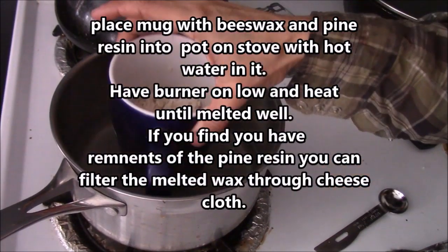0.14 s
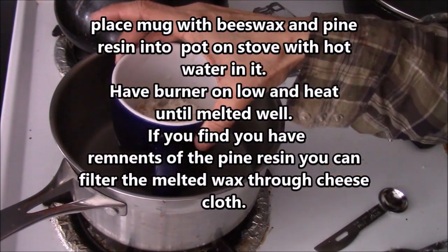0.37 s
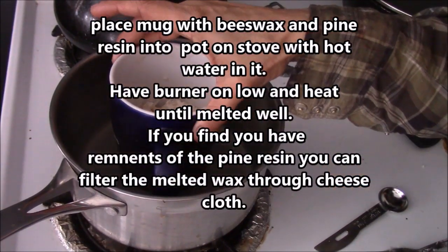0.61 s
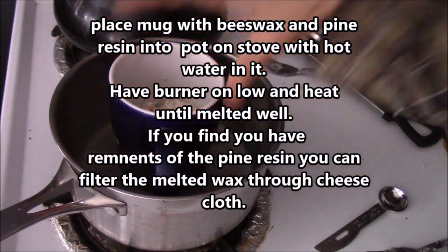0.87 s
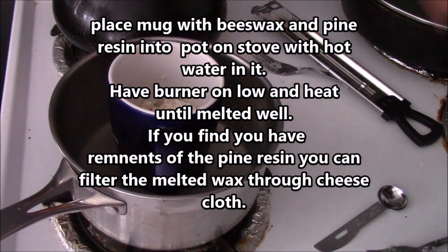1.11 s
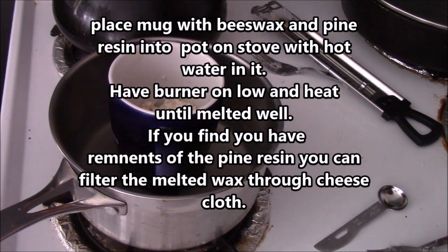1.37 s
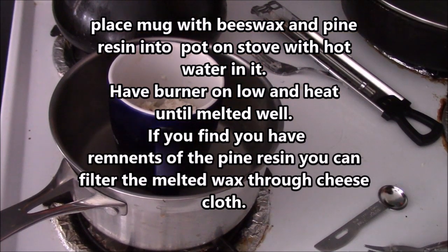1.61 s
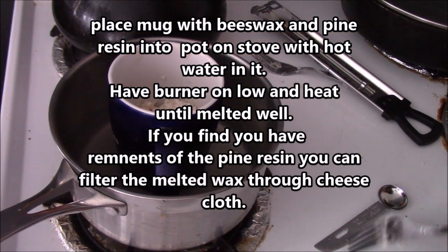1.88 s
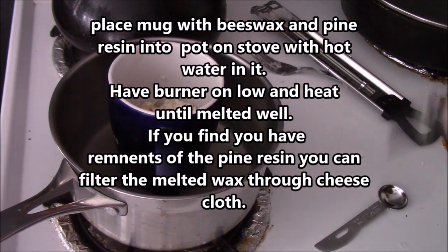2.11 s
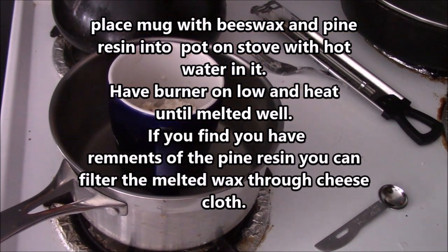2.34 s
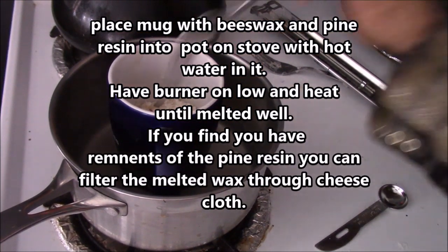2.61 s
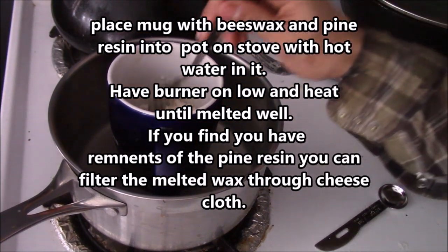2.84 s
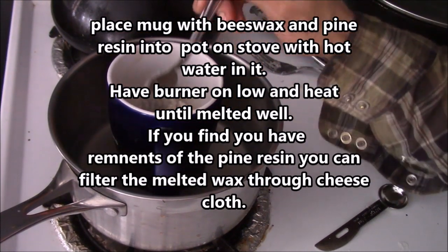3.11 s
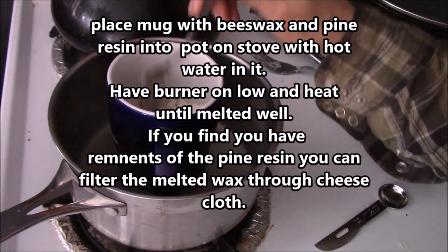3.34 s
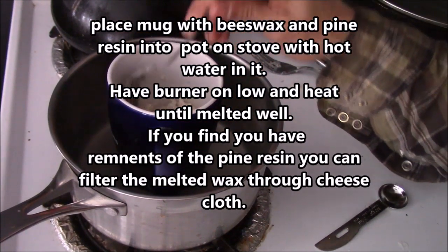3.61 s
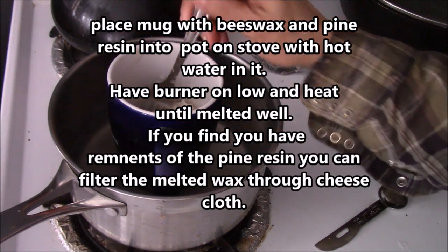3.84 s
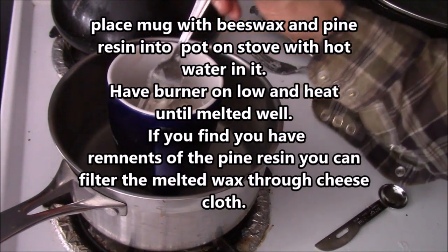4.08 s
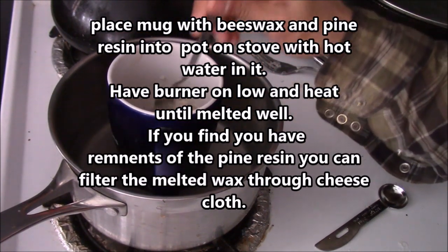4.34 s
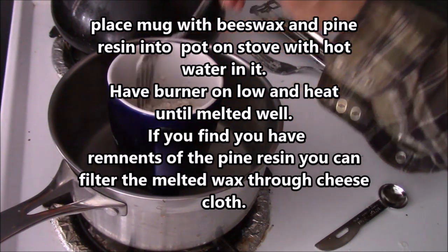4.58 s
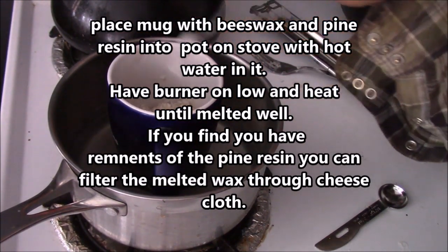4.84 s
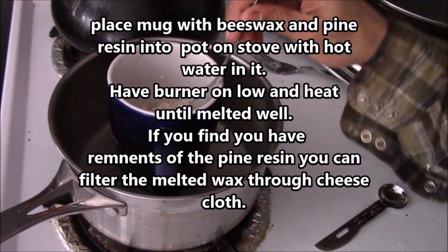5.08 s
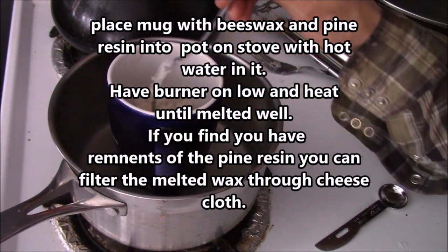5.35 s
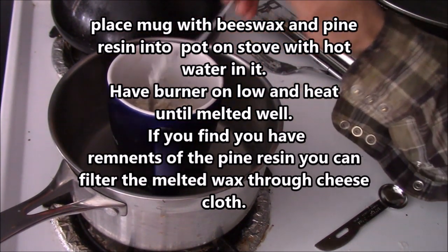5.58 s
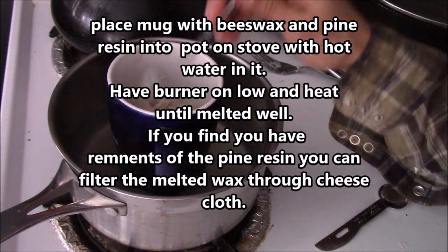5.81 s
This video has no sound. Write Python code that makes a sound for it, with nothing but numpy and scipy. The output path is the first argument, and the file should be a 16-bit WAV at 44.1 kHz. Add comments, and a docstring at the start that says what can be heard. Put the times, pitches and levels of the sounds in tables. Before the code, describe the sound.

Close kitchen sounds: a hard mug-on-pan knock, a brief metallic drawer clash, then sparse spoon clinks and scrapes above a soft airy bed.

```python
"""A ceramic mug is set down into a steel pan of hot water: its blows ring struck pan modes and dull stove thuds.
Cutlery clashes and shakes in a drawer nearby (noise cracks, damped modes); then a spoon stirs in the mug
(friction grains driving modes) and taps its wall (struck modes of mug and spoon).
Under it lie filtered noises: kitchen air coloured by pan and stove, simmer, a mains hum, a rustling sleeve.
A small, nearly mono microphone pair stands close."""
import sys
import numpy as np
from scipy import signal
from scipy.fft import rfft, irfft, next_fast_len
from scipy.io import wavfile
from scipy.ndimage import uniform_filter1d, map_coordinates

SR = 44100
rng = np.random.default_rng(int(sys.argv[2]) if len(sys.argv) > 2 else 0)


def put_to_file(sound):
    """Save the sound as 16-bit audio at rate SR, in the file named by the first command-line argument."""
    columns = np.atleast_2d(sound).T  # one column per channel
    safe = np.clip(columns, -1, 1)
    whole_steps = np.round(safe * 32767)
    wavfile.write(sys.argv[1], SR, whole_steps.astype(np.int16))


def amplitude_ratio(level_db):
    """Convert a level in decibels to the matching linear amplitude (field) ratio."""
    exponent = np.asarray(level_db, float) / 20
    return 10 ** exponent


N = 262465
T = np.arange(N) / SR
HALF_T = T[:SR // 2]  # time axis of one contact [s]
OPPOSITE = np.array([[1], [-1]])  # left plus, right minus

# mug modes: (frequency [Hz], level [dB], t60 before scaling [s])
MUG_MODES = [(1953, -7.5, 0.17), (2670, 1, 0.09), (2790, 5.5, 0.07), (2990, 6.5, 0.07), (3300, 2, 0.06),
             (4630, -10, 0.04), (5270, 2, 0.048), (6500, 0, 0.024), (7400, -20, .04), (7650, -23, 0.11),
             (8100, -24, 0.06), (8970, 0, 0.034), (9630, -18, 0.105), (10450, -9, 0.022),
             (11650, -11, 0.02), (12900, -9, .014), (15400, -22, .025)]
# spoon bowl modes, free of wax: (frequency [Hz], level [dB], t60 before scaling [s])
BOWL_MODES = [(3545, -17, 0.3), (5795, 0, 0.06), (12330, -14, 0.026), (13540, -2, .045), (13900, -12, 0.05)]
# spoon handle modes: (frequency [Hz], level [dB], t60 before scaling [s])
HANDLE_MODES = [(3542, -17, .2), (5300, 0, .016), (5900, -3, .012), (6648, -3, .075), (8700, 0, .018),
                (9850, -12, .06), (10150, -11, .06), (10450, -10, .06), (12000, 3, .011), (12850, 4, .012),
                (13875, -16, .07)]


def unit(x):
    """Scaled to rms 1."""
    return x / np.sqrt(np.mean(x ** 2) + 1e-20)


def along(points, hz):
    """(Hz, value) points interpolated on a log frequency axis."""
    f, v = np.transpose(points)
    return np.interp(np.log(hz + 1), np.log(f + 1), v)


def curves(rows):
    """One value per sample for each column after the time."""
    s, *cols = np.transpose(rows)
    return [np.interp(T, s, c) for c in cols]


def wobble(rate_hz):
    """Smooth random curve through rate_hz knots a second (at most 40)."""
    knots = rng.standard_normal(int(N * 40 / SR) + 4)
    return map_coordinates(knots, [T * rate_hz])


def filtered(x, response):
    """x times a complex response of frequency."""
    m = next_fast_len(x.shape[-1] + SR // 2)
    spectrum = rfft(x, m) * response(np.fft.rfftfreq(m, 1 / SR))
    return irfft(spectrum, m)[..., :x.shape[-1]]


def bands(peaks):
    """Causal sum of resonances (Hz, width Hz, dB), alternating in sign."""
    def response(f):
        return sum((-1) ** k * amplitude_ratio(db) * 1j * f * w / (c * c - f * f + 1j * f * w)
                   for k, (c, w, db) in enumerate(peaks))
    return response


def steep(peaks):
    """The resonances passed twice, for steeper skirts."""
    return lambda f: bands(peaks)(f) ** 2


def noise(response, size=N):
    """Coloured noise of rms 1."""
    return unit(filtered(rng.standard_normal(size), response))


def grains():
    """Two noises sharing a strength that jumps from one millisecond to the next."""
    strength = unit(uniform_filter1d(rng.standard_normal(N), size=60))
    return amplitude_ratio(2.16 * strength) * rng.standard_normal((2, N))


def add(out, s, piece):
    """Mixes a piece in at time s."""
    part = out[round(s * SR):][:len(piece)]
    part += piece[:len(part)]


def fade(level_db, t60_s, t=HALF_T):
    """Exponential decay from level_db."""
    return amplitude_ratio(level_db - 60 * t / t60_s)


def octaves(modes, hz):
    """Distance of each mode from a frequency."""
    return np.log2(np.transpose(modes)[0] / hz)


def ring(modes, gain_db=0, scatter_db=1.5, attack_s=0.0002, decay=1):
    """Struck modes as decaying sines, at new strengths each blow; gain_db may differ from mode to mode."""
    hz, db, t60_s = np.transpose(modes)[..., None]
    db = db + np.reshape(gain_db, (-1, 1)) + scatter_db * rng.standard_normal(hz.shape)
    sines = fade(db, decay * t60_s) * np.sin(2 * np.pi * hz * HALF_T)
    return np.sum(sines, axis=0) * (1 - np.exp(-HALF_T / attack_s))


def strokes(rows):
    """Gain of strokes (start s, length s, dB): a linear rise, a hold, an exponential fall."""
    rise_s, fall_s = 0.0084, 0.011
    gain = 0
    for s, length_s, db in rows:
        fall = np.exp(-np.clip(T - s - length_s, 0, None) / fall_s)
        gain = gain + amplitude_ratio(db) * np.clip((T - s) / rise_s, 0, 1) * fall
    return gain


def kitchen_air():
    """Air noise coloured by narrow pan and stove resonances, plus a part unlike at the two ports."""
    # air spectrum before level scaling: (frequency [Hz], density [dB per Hz])
    air_spectrum = [(15, -63), (25, -48), (75, -24.5), (125, -9.5), (341, -1), (411, -6.5), (705, -5),
                    (898, -9.5), (1030, -9), (1270, -6), (1670, -11.5), (1960, -14), (2500, -15),
                    (6410, -23.5), (8860, -20.5), (15600, -45.5)]
    # bands where pan and stove colour the air: (centre [Hz], width [Hz], level [dB])
    pan_colour = [(280.7, 13.3, 6), (455.7, 20, 8), (697, 130, -2.5), (894.4, 40, 11.5), (2048, 66, 9.5),
                  (2814, 210, 4.5), (4640, 20, 11), (5655, 90, 7.5), (8840, 820, 4.5), (12500, 200, -6)]
    # fuller while the arm is over the pan: (time [s], level before drift [dB rms])
    air_level = [(0, -48.5), (.6, -48), (1.1, -49.5), (5.95, -52)]
    # tilt of the unlike part before level scaling: (frequency [Hz], side minus mid [dB])
    side_tilt = [(60, -14), (130, -12.5), (290, -16.5), (640, -15.5), (1410, -18.5), (2200, -12.5),
                 (3800, -17), (6820, -16.5), (15000, -33)]

    def shape(f):
        boost = sum((amplitude_ratio(2 * db) - 1) / (1 + (2 * (f - c) / w) ** 2) for c, w, db in pan_colour)
        return amplitude_ratio(along(air_spectrum, f)) * np.sqrt(1 + boost)

    air_db, = curves(air_level)
    alike = amplitude_ratio(air_db + 0.4 * wobble(6)) * noise(shape)
    unlike = amplitude_ratio(air_db - 14) * noise(lambda f: shape(f) * amplitude_ratio(along(side_tilt, f)))
    return alike + unlike * OPPOSITE


def lowered_hum():
    """Hum of the air gap under the lowered mug, strong up to 0.21 s, then fainter to 0.29 s."""
    # air gap resonance: (centre [Hz], width [Hz], level before scaling [dB])
    air_gap = [(723, 100, 0)]
    strong_until_s, faint_until_s = 0.21, 0.29
    gain = strokes([(-1, 1 + strong_until_s, -54.5), (strong_until_s, faint_until_s - strong_until_s, -62)])
    return gain * noise(steep(air_gap))


def simmer():
    """Simmer rings the water gap: muffled while the hand holds the mug, opening when let go, then settling."""
    # water gap under the mug: (centre [Hz], width [Hz], level before scaling [dB])
    water_gap = [(1140, 140, -2.5), (1275, 113, 4.5), (1342.4, 165, 0)]
    held_db, open_db, settled_db = -59, -46.5, -52.5
    let_go_s, hand_leaves_s, open_hold_s, settle_s = 0.76, 0.035, 0.57, 0.43
    settling = np.exp(-np.clip(T - let_go_s - open_hold_s, 0, None) / settle_s)
    opened_db = settled_db + (open_db - settled_db) * settling
    opening = np.clip((T - let_go_s) / hand_leaves_s, 0, 1)
    level_db = held_db + (opened_db - held_db) * opening + 1.2 * wobble(25.27)
    return amplitude_ratio(level_db) * noise(steep(water_gap))


def mug_singing():
    """The mug's lowest mode, kept sounding by the simmer; it sings out as fingers or spoon slide along it."""
    # slides: (start [s], length [s], added level [dB rms])
    swells = [(.56, 0.073, -53), (3.594, 0.03, -51)]
    gain = (amplitude_ratio(-59.5) + strokes(swells)) * amplitude_ratio(0.15 * wobble(2.3))
    return gain * noise(bands([(MUG_MODES[0][0], 22, 0)]))


def mains_hum():
    """An unsteady mains overtone as a narrow noise band."""
    # overtones: (frequency [Hz], level [dB rms])
    overtones = [(359.5, -62.5)]
    return sum(amplitude_ratio(db) * noise(steep([(hz, 14, 0)])) for hz, db in overtones)


def rubbing():
    """Grainy friction noise of sleeve and spoon strokes; cloth is wide, so the ports differ a little."""
    # friction spectrum before level scaling: (frequency [Hz], density [dB per Hz])
    cloth_spectrum = [(1500, -49), (3000, 3), (6000, -5), (9000, 1.5), (11500, -3.5), (12400, -9),
                      (13500, -4.5), (15500, -14), (15900, -62)]
    # the sleeve's constant rustle: (time [s], level [dB rms])
    sleeve_level = [(0, -63), (.6, -60), (1.5, -66), (5.95, -65)]
    # sleeve and spoon strokes: (start [s], length [s], added level [dB rms])
    rub_strokes = [(.14, 0.054, -63), (1.585, 0.035, -46.5), (2.925, 0.02, -62), (3.3, 0.016, -62),
                   (3.62, 0.05, -74), (4.32, 0.053, -57.5), (4.92, 0.065, -60), (5.32, 0.14, -66),
                   (5.78, 0.024, -61)]
    mid, side = filtered(grains(), lambda f: amplitude_ratio(along(cloth_spectrum, f)))
    gain = amplitude_ratio(curves(sleeve_level)[0]) + strokes(rub_strokes)
    return gain * unit(mid + 0.15 * side * OPPOSITE)


def bumps():
    """Dull bumps through stove top and counter ring the modes near their pitch, with a rumble of loose parts."""
    # bumps: (time [s], thud peak [dB], centre [Hz], t60 before mode scaling [s])
    bump_rows = [(0.031, -44, 293, 0.024), (0.335, -21, 417, 0.03), (0.352, -23, 231, 0.043),
                 (.354, -30.5, 560, 0.055), (.368, -30.5, 223, 0.042), (.386, -36, 483, .04),
                 (.412, -45, 565, 0.035), (0.639, -43, 460, 0.033), (0.8, -40, 267, 0.1),
                 (1.488, -37, 340, 0.11), (1.589, -40, 312, 0.31), (1.7441, -26, 480, 0.07),
                 (1.776, -31.5, 395, 0.052), (1.797, -32.5, 330, 0.099), (1.8204, -23, 280, 0.041),
                 (1.8242, -22.5, 252, 0.041), (1.833, -33.5, 227, 0.071), (1.861, -34, 300, 0.054),
                 (1.882, -39.5, 264, 0.095), (2.873, -47, 447, 0.089), (3.514, -30.5, 330, 0.067),
                 (3.528, -40, 282, 0.088), (3.5466, -28.5, 290, 0.032), (3.558, -37.5, 293, 0.1),
                 (3.721, -35.5, 330, 0.075), (3.75, -40, 226, 0.16), (4.9, -38, 277, 0.062),
                 (4.929, -40, 335, 0.11), (5.502, -44.5, 274, 0.19), (5.778, -40.5, 344, 0.088)]
    # stove modes: (frequency [Hz], level [dB], decay relative to the bump's t60)
    stove_modes = [(161.4, 6.5, 3.5), (200.4, 1, 2.3), (277, 6, 1), (330.3, 3.5, 1.2), (376, 4.5, 0.39),
                   (429.5, 0.5, 0.99), (467, 3, 0.89), (555, 6, 0.86)]
    out = np.zeros(N)
    for s, db, hz, t60_s in bump_rows:
        thud = ring(stove_modes, -36 * octaves(stove_modes, hz) ** 2, scatter_db=2, attack_s=0.003, decay=t60_s)
        rumble = noise(steep([(hz, 0.9 * hz, 0)]), size=len(HALF_T))
        loose = fade(-8.5, 2 * t60_s) * (1 - np.exp(-HALF_T / 0.0062)) * rumble
        add(out, s, amplitude_ratio(db) * (thud / np.abs(thud).max() + loose))
    return out


def ticks():
    """Small ticks of wax, water and fingers: millisecond noise bursts in a band round their centre."""
    # ticks: (time [s], onset level before the treble cut [dB rms], centre [Hz], width relative to centre)
    tick_rows = [(0.0637, -46.5, 8770, 0.65), (.1092, -49, 11000, .9), (0.1454, -47, 9000, 0.25),
                 (0.159, -47, 8000, 1.5), (.2768, -43, 5900, 0.16), (0.3143, -33.5, 8600, 0.091),
                 (0.706, -42.5, 6960, 2.3), (1.34, -46, 6960, 0.89), (2.7317, -44.5, 7400, 1.8),
                 (2.759, -57, 12500, .5), (2.789, -57, 11500, .5), (2.801, -55, 8500, .6),
                 (2.813, -59, 13000, 0.32), (2.871, -48, 7500, 2.2), (3.1393, -50, 11500, .7),
                 (3.1694, -54, 9090, .7), (3.7894, -55, 10500, .12), (4.1894, -54, 9600, .7),
                 (4.3837, -57, 10500, .7), (5.3474, -50, 10500, .8), (5.354, -48, 9000, 0.43),
                 (5.4394, -52, 12000, .7)]
    out, t = np.zeros(N), T[:SR // 20]
    for s, db, hz, wide in tick_rows:
        add(out, s, fade(db, 0.026, t) * noise(steep([(hz, wide * hz, 0)]), size=len(t)))
    return filtered(out, lambda f: 1 / (1 + (f / 15200) ** 24))


def slide():
    """Fingers slip on the wet glaze: stick and slip of skin, grainy noise in a few high bands."""
    # slips: (start [s], length [s], level [dB rms])
    slips = [(.14, 0.096, -60)]
    # squeal bands before level scaling: (centre [Hz], width [Hz], level [dB])
    squeal_bands = [(9000, 800, -3), (11250, 600, -2), (13400, 1000, -1), (15500, 410, -8)]
    return strokes(slips) * unit(filtered(grains()[0], steep(squeal_bands)))


def knocks():
    """The mug's foot strikes the pan; longer contact dulls the upper modes, a heavier one drives the low ones."""
    # knocks: (time [s], peak [dB], contact softness as inverse corner frequency [ms],
    #          weight on modes below 700 Hz [dB])
    knock_rows = [(0.1593, -17.5, 0.78, -30), (0.3169, -6.5, 0.16, 5.5), (0.329, -20.5, 0.21, -19),
                  (.371, -36, 0.25, -15), (0.6358, -25.5, 1.16, -1), (2.871, -30.5, 0.9, -13)]
    # pan modes: (frequency [Hz], level [dB], t60 [s])
    pan_modes = [(210, -7, 0.13), (368, -3, 0.05), (460, -1.5, 0.083), (547, -11.5, 0.17), (594, -7, 0.06),
                 (917, 6, 0.029), (1054, -1.5, 0.055), (1225, 13.5, 0.013), (1760, 8.5, 0.014),
                 (1930, -9, 0.037), (2270, -8, 0.013), (3370, -24, 0.02), (4030, -18, 0.013)]
    out = np.zeros(N)
    for s, db, soft_ms, weight_db in knock_rows:
        blow = ring(pan_modes, weight_db * (octaves(pan_modes, 700) < 0), attack_s=0.00021)
        # gritty crack of glaze on steel
        blow = blow + fade(-1.5, 0.045) * noise(bands([(2170, 1750, 0)]), size=len(blow))
        blow = filtered(blow, lambda f: 1 / (1 + 1j * f * soft_ms / 1000) ** 2)
        add(out, s, amplitude_ratio(db) * blow / np.abs(blow).max())
    return out


def drawer():
    """A quick cluster of steel contacts, each a crack and a damped ring, then shaken contents as the drawer shuts."""
    # cutlery jostling: (time [s], level [dB])
    jostle_rows = [(1.6113, -19.5), (1.6133, -16), (1.6163, -18), (1.6188, -21), (1.6237, -30),
                   (1.629, -34), (1.636, -47), (1.643, -51), (1.651, -42)]
    # crack spectrum before level scaling: (frequency [Hz], density [dB per Hz])
    clash_spectrum = [(880, -57), (1500, -31), (1990, -4), (3110, -21), (4750, -0.5), (7640, -4.5),
                      (9540, 1), (15000, -7), (16800, -43)]
    # cutlery modes: (frequency [Hz], level [dB], t60 before damping [s])
    cutlery_modes = [(2167, -13.5, 0.26), (2870, -19.5, 0.38), (3420, -19, 0.15), (4700, -15, 0.065),
                     (5940, -8, 0.031), (9300, -25, 0.064), (9500, 5.5, 0.032), (9900, -22, 0.08),
                     (10800, -14, 0.075), (10800, -2, 0.023), (12500, -19, 0.072), (13170, -29, 0.11),
                     (13580, -28, 0.082), (14810, -21, 0.067)]
    # the drawer shuts and its contents shake: (time [s], onset level [dB rms], t60 [s])
    shut_rows = [(1.7441, -27, 0.058), (1.7494, -30.5, 0.04), (1.7575, -33.5, 0.04), (1.765, -38.5, .05),
                 (1.778, -41, 0.043), (1.786, -44, 0.054), (1.802, -51, .05)]
    # rattle spectrum before level scaling: (frequency [Hz], density [dB per Hz])
    rattle_spectrum = [(180, -50), (300, -7), (946, -8), (1080, -9), (1660, -10), (2570, -15.5),
                       (4020, -21.5), (7320, -17), (13800, -28), (16000, -62)]
    # modes of the contents: (frequency [Hz], level [dB], t60 before damping [s])
    contents_modes = [(670, -4, 0.071), (890, -6, 0.06), (1980, -2, 0.098), (2170, -4.5, 0.13),
                      (2600, -2, 0.08), (3040, -1.5, 0.07), (3200, -0.5, 0.085), (3720, -4.5, 0.046),
                      (4450, -4.5, 0.042), (4890, -9, 0.066), (5570, -7, 0.055), (6350, -7, 0.063),
                      (6850, -15, 0.07), (7390, -5.5, 0.084)]
    out, size = np.zeros(N), len(HALF_T)
    for s, db in jostle_rows:
        crack = fade(-2, 0.012) * noise(lambda f: amplitude_ratio(along(clash_spectrum, f)), size=size)
        ting = ring(cutlery_modes, scatter_db=3, decay=0.45)
        add(out, s, amplitude_ratio(db) * (crack + amplitude_ratio(-12) * ting))
    for s, db, t60_s in shut_rows:
        shaken = unit(filtered(grains()[0, :size], lambda f: amplitude_ratio(along(rattle_spectrum, f))))
        add(out, s, fade(db, t60_s) * (1 - np.exp(-HALF_T / 0.0013)) * shaken)
        blows = fade(0, 0.015) * grains()[0, :size]  # many small contacts in quick succession
        clink = signal.fftconvolve(blows, ring(contents_modes, scatter_db=5, decay=0.36))[:size]
        add(out, s, amplitude_ratio(db) * clink / np.abs(clink).max() * 2)
    return out


def loaded(s):
    """The bowl's modes at time s; wax clinging to the bowl lowers its pitch."""
    # wax load: (time [s], pitch ratio)
    wax_pitch = [(3.0, .966), (3.4, 1.0)]
    return np.array(BOWL_MODES) * [np.interp(s, *np.transpose(wax_pitch)), 1, 1]


def scrape():
    """Spoon dragged along the glaze: friction grains keep mug and spoon modes sounding, the bowl's upper ones least."""
    # drags: (start [s], length [s], mug ringing [dB rms], spoon ringing [dB rms])
    drag_rows = [(2.79, 0.086, -65, -67), (3.594, 0.045, -62, -77), (4.922, 0.056, -56.5, -80)]
    mug_and_handle = np.vstack([MUG_MODES, HANDLE_MODES])
    out = 0
    for s, length_s, mug_db, spoon_db in drag_rows:
        mug_tone = ring(mug_and_handle, 3 * octaves(mug_and_handle, 5000), decay=0.6)
        spoon_tone = ring(loaded(s), -14 * (octaves(BOWL_MODES, 8000) > 0))
        for db, drive, tone in zip((mug_db, spoon_db), grains(), (mug_tone, spoon_tone)):
            out = out + strokes([(s, length_s, db)]) * unit(signal.fftconvolve(drive, tone)[:N])
    return out


def settled(modes, gain_db, decay):
    """Brief modes are damped when the spoon settles on the wall; modes with t60 above 0.1 s ring on."""
    modes = np.array(modes)
    lasting = modes[:, 2] > 0.1
    settle = amplitude_ratio(-12 * np.clip((HALF_T - 0.004) / 0.004, 0, 1))
    brief_ring = ring(modes, gain_db - 200 * lasting, decay=decay)
    lasting_ring = ring(modes, gain_db - 200 * ~lasting, decay=decay)
    return brief_ring * settle + lasting_ring


def taps():
    """Spoon on the mug wall: each tap rings mug and bowl, with a brief crack and chatter of the bowl on the glaze."""
    # taps: (time [s], mug [dB], spoon [dB], brightness [dB/octave],
    #        extra on the mug's lowest mode [dB], ring length ratio)
    tap_rows = [(2.934, -80, -48.5, 1, 0, 0.89), (2.943, -80, -66, 12, 0, 1), (2.977, -80, -62, 7, 0, 1),
                (3.5146, -68, -46.5, -9, 31, .7), (4.8857, -31, -56, 7, 9, 1),
                (4.9176, -42.5, -70, 6, 15, 0.84)]
    out, size = np.zeros(N), len(HALF_T)
    lowest = np.arange(len(MUG_MODES)) == 0
    for s, mug_db, spoon_db, tilt_db, low_db, decay in tap_rows:
        mug = settled(MUG_MODES, tilt_db * octaves(MUG_MODES, 4400) + low_db * lowest, decay)
        crack = fade(-15, 0.011) * noise(bands([(7000, 14000, 0)]), size=size)
        chatter = fade(-11, 0.04) * noise(steep([(2900, 900, 0), (13000, 7000, -3)]), size=size)
        bowl = ring(loaded(s), tilt_db * octaves(BOWL_MODES, 5000), decay=decay)
        add(out, s, amplitude_ratio(mug_db) * (mug + crack + chatter) + amplitude_ratio(spoon_db) * bowl)
    return out


def handle():
    """The handle clicks and rings when it meets the rim: a noise crack over struck modes."""
    # rim contacts: (time [s], level [dB])
    rim_rows = [(3.5963, -41), (4.886, -62), (4.9183, -64)]
    out = np.zeros(N)
    for s, db in rim_rows:
        crack = fade(5, 0.008) * noise(steep([(11500, 7000, 0)]), size=len(HALF_T))
        add(out, s, amplitude_ratio(db) * (ring(HANDLE_MODES) + crack))
    return out


def room(x):
    """The kitchen's answer, dying at its own speed in each band, partly unlike left and right."""
    # reverberation: (frequency [Hz], t60 [s])
    room_t60 = [(150, 0.6), (1000, 0.67), (4000, 0.27), (14000, 0.13)]
    hz, t, z = signal.stft(rng.standard_normal((2, SR // 2)), SR, nperseg=256)
    decayed = z * amplitude_ratio(-60 * t / along(room_t60, hz)[:, None])
    mid, side = signal.istft(decayed, SR, nperseg=256)[1]
    tail = np.array([mid + 0.036 * side, mid - 0.11 * side]) / np.linalg.norm(mid)
    delayed = np.pad(x, (200, 0))[None]  # 200 samples of pre-delay
    return signal.fftconvolve(delayed, tail, axes=1)[:, :N]


def scene():
    """Near contacts with a little room, the drawer further off, over the steady bed."""
    def radiate(f):  # small objects send out little deep bass
        return (1j * f / (1j * f + 80)) ** 6

    bed = kitchen_air() + lowered_hum() + simmer() + mug_singing() + mains_hum() + rubbing()
    near = filtered(ticks() + slide() + knocks() + scrape() + taps() + handle(), radiate)
    far, low = filtered(np.array([drawer(), bumps()]), radiate)
    # treble reaches the ports slightly out of step
    lean = amplitude_ratio(-12) * filtered(far + near, lambda f: 1j * f / (f + 9000))
    answer = room(amplitude_ratio(-16.5) * near + amplitude_ratio(-10.5) * far + amplitude_ratio(-31) * low)
    return near + far + low + lean * OPPOSITE + answer + bed


def low_pass(x):
    """Removes everything above the highest recorded frequency."""
    return signal.sosfilt(signal.butter(12, 17160, fs=SR, output="sos"), x)


def record(dry):
    """Each microphone adds its own faint low self-noise; the band ends at top_hz."""
    top_hz = 17000
    own = amplitude_ratio(-79.5) * np.array([noise(lambda f: (f > 25) * (f < top_hz) / (1 + f / 60)) for _ in dry])
    mix = filtered(dry + own, lambda f: f < top_hz)
    return low_pass(mix)


dry = scene()
out = record(dry)
put_to_file(out)
```